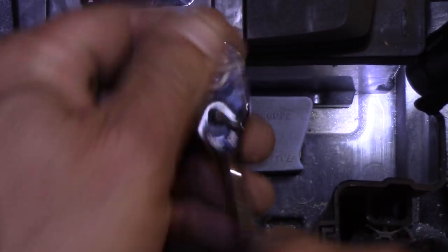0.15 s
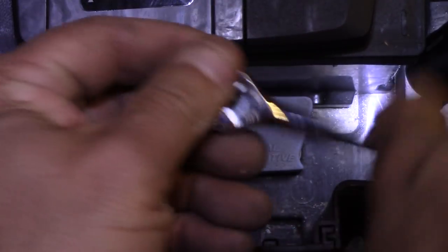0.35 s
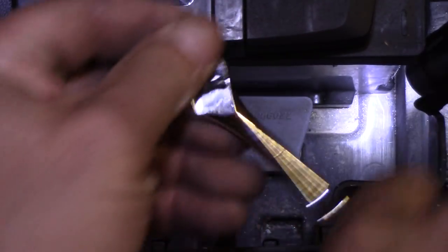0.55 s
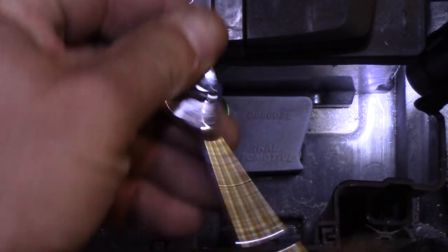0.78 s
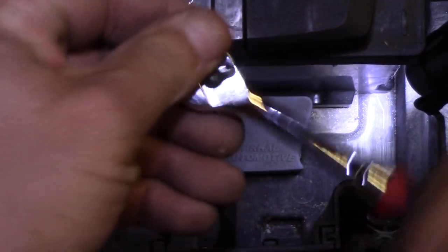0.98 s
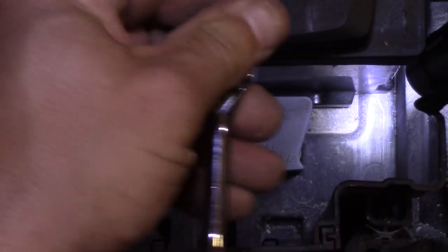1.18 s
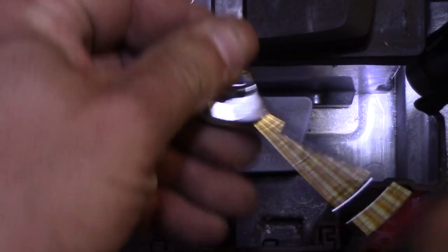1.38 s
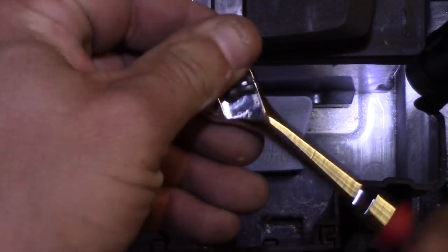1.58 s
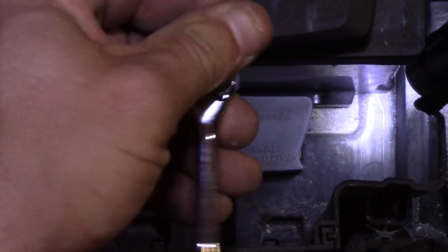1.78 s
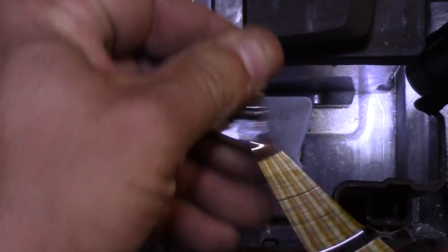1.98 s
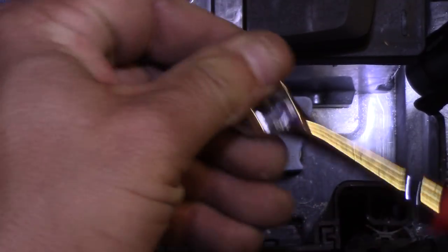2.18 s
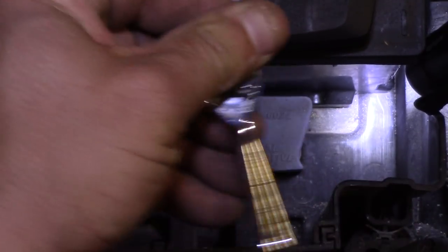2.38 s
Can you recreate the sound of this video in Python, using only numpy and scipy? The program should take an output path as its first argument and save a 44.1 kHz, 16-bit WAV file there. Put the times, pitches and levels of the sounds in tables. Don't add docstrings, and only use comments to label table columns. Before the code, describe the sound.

A hand ratchet clicks in four rapid bursts, at about 0.28-0.45, 0.87-0.96, 1.39-1.51 and 2.03-2.17 seconds, the second fastest and starting loudest. Each click is a crisp, bright steel snap. Between bursts, slack knocks a plastic cover dully, notably near 0.22, 0.57-0.69, 0.95 and 1.6 seconds, with gritty rubbing, dry ticks and low palm rustle. Close microphone, short dull engine-bay echo, faint garage hum.

```python
import sys
import numpy as np
from scipy import signal
from scipy.fft import rfft, irfft
from scipy.io import wavfile
from scipy.ndimage import uniform_filter1d

SR = 44100
rng = np.random.default_rng(int(sys.argv[2]) if len(sys.argv) > 2 else 0)


def invert_db(level):
    return 10 ** (np.asarray(level, dtype=float) / 20)


def pcm_store(signal):
    levels = np.round(np.clip(np.atleast_2d(signal), -1, 1) * 32767)
    wavfile.write(sys.argv[1], SR, levels.astype(np.int16).T)


N = 108045


def level(x, db):
    return x * invert_db(db) / np.sqrt(np.mean(x ** 2) + 1e-30)


def loudest(x, span_s):
    power = uniform_filter1d(x ** 2, int(span_s * SR))
    return x / np.sqrt(power.max())


def colour(x, table):
    hz, db = np.array(table, float).T
    f = np.maximum(np.arange(len(x) // 2 + 1) * SR / len(x), 1)
    gain = invert_db(np.interp(np.log(f), np.log(hz), db))
    return irfft(rfft(x) * gain, len(x))


def walk(rate_hz):
    hold = int(SR / rate_hz)
    steps = np.repeat(rng.standard_normal(N // hold + 1), hold)
    smooth = uniform_filter1d(uniform_filter1d(steps, hold), hold)
    return 4 / 3 * smooth[:N]


def add(out, x, s):
    i = max(int(s * SR), 0)
    out[i:i + len(x)] += x[:N - i]


def grit(size, grain_db):
    return rng.standard_normal(size) * invert_db(grain_db * rng.exponential(size=size))


def ring(drive, modes, spread, tilt_db=0, count=4):
    scatter_db = 1.7
    hz, db, t60 = np.repeat(np.array(modes, float), count, axis=0).T
    shift, cluster_luck = rng.standard_normal((2, len(hz)))
    mode_luck = np.repeat(rng.standard_normal(len(modes)), count)
    t = np.arange(min(2048, int(t60.max() * SR) + 64))[:, None] / SR
    hz = hz * (1 + spread * shift)
    gain = invert_db(db + scatter_db * (cluster_luck + mode_luck) + tilt_db * np.log2(hz / 1000))
    decay = np.exp(-np.log(1000) * t / np.maximum(t60, .003))
    body = (gain * decay * np.sin(2 * np.pi * hz * t)).sum(axis=1)
    return signal.fftconvolve(drive, body)[:len(drive)]


def garage():
    # (frequency [Hz], level [dB per Hz])
    hum = [(30, -30), (70, -15), (130, -6.5), (450, -1.5), (1400, -10), (8000, -25.5), (16000, -40.5)]
    return level(colour(rng.standard_normal(N), hum), -51)


def shuffle():
    centre_hz, rustle_db, swing_db = 211, -62.5, 4.5
    # (time of peak [s], level [dB], width [s])
    lean = [
        (.24, -5, 0.027),
        (.71, 11, 0.055),
        (1.05, -7, 0.027),
        (1.42, 10, 0.14),
    ]
    band = signal.butter(2, [centre_hz * .5, centre_hz * 2], "band", fs=SR)
    t = np.arange(N) / SR
    lean_db = sum(db * np.exp(-.5 * ((t - s) / width) ** 2) for s, db, width in lean)
    rustle = signal.lfilter(*band, signal.lfilter(*band, rng.standard_normal(N)))
    return level(rustle, rustle_db) * invert_db(lean_db + swing_db * walk(8.86))


def rub():
    grain_db, flicker_db = 2.2, 1.5
    # (time of peak [s], level [dB], rise [s], fall [s])
    swells = [(.01, -47.5, .05, 0.058), (.56, -62, 0.0041, 0.028), (.625, -51, 0.017, .015),
              (0.647, -43, 0.0055, 0.029), (0.713, -44.5, 0.027, 0.027), (1.005, -51, 0.014, 0.018),
              (1.177, -43.5, .045, 0.049), (1.55, -52, 0.0096, 0.032), (1.719, -47.5, 0.033, 0.053),
              (1.84, -53, 0.0083, 0.019), (1.95, -55.5, 0.017, 0.014), (2.41, -53, 0.041, 0.035)]
    # (frequency [Hz], level [dB per Hz])
    hiss = [(60, -57), (400, -0.5), (1500, 0), (3500, -3), (4700, -3), (6000, -10), (11000, -16),
            (16000, -35)]
    t = np.arange(N) / SR
    swell = np.zeros(N)
    for s, db, rise, fall in swells:
        width = np.where(t < s, rise, fall)
        swell += invert_db(db) * np.exp(-.5 * ((t - s) / width) ** 2)
    grains = level(colour(grit(N, grain_db), hiss), 0)
    return grains * swell * invert_db(flicker_db * walk(37.34))


def ticks():
    decay_s = .002
    # (time [s], peak level [dB], centre frequency [Hz])
    contacts = [(0.153, -44.5, 2370), (0.557, -43, 3300), (0.572, -35, 3900), (0.645, -35, 8350),
                (.668, -50, 9000), (0.684, -37, 2700), (0.856, -45, 8200), (1.002, -44, 2800),
                (1.031, -35.5, 3400), (1.066, -47.5, 8050), (1.09, -47, 3900), (1.154, -47, 9000),
                (1.176, -34, 3520), (1.177, -34.5, 8800), (1.289, -43, 2200), (1.371, -46, 8350),
                (1.552, -40.5, 3500), (1.584, -37, 2800), (1.608, -38, 2900), (1.815, -44.5, 6000),
                (1.836, -41, 6000), (1.868, -46.5, 5000), (2.012, -46, 8100), (2.24, -54, 7500),
                (2.325, -50.5, 8250), (2.366, -40.5, 10300), (2.395, -47, 6960)]
    out, t = np.zeros(N), np.arange(1024) / SR
    for s, db, hz in contacts:
        band = signal.butter(3, [hz / 1.7, hz * 1.35], "band", fs=SR)
        burst = rng.standard_normal(len(t)) * np.exp(-t / decay_s)
        add(out, invert_db(db) * loudest(signal.lfilter(*band, burst), 0.0068) / 2, s)
    return out


def knocks():
    # (time [s], rms level [dB], build-up [s], fade [s], brightness [dB per octave])
    pushes = [(0.156, -57, 0.0058, 0.0052, -10), (0.814, -44, 0.0019, 0.01, -22),
              (0.201, -44, 0.0074, .004, -4), (0.221, -30.5, 0.0063, 0.0058, -11.5),
              (.235, -40, 0.0022, 0.0034, 6), (.244, -40.5, 0.004, 0.0035, -20),
              (0.546, -39, 0.0083, 0.0095, 5), (.561, -32, 0.0018, 0.0039, 2),
              (0.573, -29, 0.0021, 0.0032, 12), (0.58, -31, 0.0042, 0.0037, -2),
              (0.589, -36.5, 0.005, 0.0018, -17.5), (.646, -34, 0.0013, 0.0023, 23.5),
              (.685, -28, 0.00057, 0.0043, -2), (.689, -24.5, 0.00081, 0.0033, -2),
              (0.71, -44, 0.021, 0.058, -15.5), (0.949, -25.5, 0.0012, 0.0052, 4),
              (1.032, -34.5, 0.0029, 0.0072, 16), (1.058, -35, 0.0064, 0.017, -0.5),
              (1.355, -41, 0.011, 0.015, -1.5), (1.552, -39, 0.012, 0.05, 4),
              (1.589, -29.5, 0.0024, 0.0075, -2), (1.61, -25.5, 0.0017, 0.0031, 3.5),
              (1.618, -32, 0.0026, 0.0036, -7), (1.974, -44.5, 0.0011, 0.0043, 8),
              (1.991, -39.5, 0.0098, 0.015, -4), (2.106, -31, 0.0036, 0.0067, -3),
              (2.213, -37, 0.0053, 0.019, 11), (2.231, -35, 0.004, 0.02, 9.5),
              (2.282, -44.5, 0.004, 0.0018, -17)]
    # (frequency [Hz], level [dB], T60 [s])
    cover = [(301, 0.5, 0.12), (474, 15.5, 0.026), (591, 22.5, 0.028), (783, 27, 0.024), (1053, 30, 0.022),
             (1248, 21, 0.024), (1598, 18.5, 0.028), (1910, 9, 0.024), (2200, 7.5, 0.018),
             (2760, -6.5, 0.03), (3270, -9.5, 0.03), (4350, -25, 0.028)]
    out = np.zeros(N)
    t = np.arange(6144) / SR - .05
    for s, db, build, fade, tilt_db in pushes:
        push = np.where(t < 0, np.exp(-.5 * (t / build) ** 2), np.exp(-np.maximum(t, 0) / fade))
        sound = ring(rng.standard_normal(len(t)) * push, cover, .015, tilt_db, count=3)
        add(out, invert_db(db) * loudest(sound, 0.0059), s + t[0])
    return out


def ratchet():
    rebound_s, rebound_db = .0014, -4
    snap_lag_s = .0007
    # (time [s], gear level [dB], extension level [dB], head level [dB], pawl level [dB])
    stroke_1 = [(0.2767, -18, -28.5, -29.5, -37), (0.294, -19.5, -27, -28.5, -36),
                (0.311, -22, -26.5, -25, -33), (0.3296, -18.5, -28.5, -29.5, -33),
                (0.3507, -21, -30, -31.5, -37), (0.368, -21, -25, -26.5, -31), (0.382, -23, -28, -32, -32),
                (0.3971, -24, -24, -30, -35), (0.4105, -24.5, -25.5, -24.5, -31),
                (0.4236, -22, -26.5, -32.5, -31), (0.4459, -18.5, -27, -26.5, -30)]
    stroke_2 = [
        (0.8654, -12.5, -32, -27.5, -33),
        (0.8759, -14, -28, -26.5, -37),
        (0.885, -19, -23, -33, -34),
        (0.8939, -15.5, -25.5, -27, -35),
        (0.9012, -18, -26, -31, -28),
        (0.9108, -17, -22.5, -27, -35),
        (0.9179, -20, -28, -31, -35),
        (0.9262, -17, -24, -37, -32),
        (0.9381, -27, -24, -24.5, -33),
        (0.9563, -21.5, -26.5, -25.5, -36),
    ]
    stroke_3 = [(1.3932, -14.5, -28.5, -33, -29), (1.4071, -22, -38, -27, -29),
                (1.4166, -19, -32.5, -28, -29), (1.4263, -19, -30.5, -24, -32),
                (1.4357, -20, -31.5, -24, -33), (1.4455, -26, -26, -24.5, -34),
                (1.4546, -20, -24.5, -24.5, -29), (1.4657, -17, -31.5, -35, -45),
                (1.4751, -19, -26.5, -24, -35), (1.4875, -22, -27, -26, -36), (1.508, -20, -30, -20.5, -35)]
    stroke_4 = [(2.0256, -22.5, -28.5, -26, -30), (2.0373, -18, -27.5, -28, -37),
                (2.0476, -19.5, -28.5, -33, -36), (2.0557, -20, -26.5, -26.5, -30),
                (2.0657, -16, -28, -27.5, -30), (2.0746, -22, -28.5, -24.5, -33),
                (2.0838, -26, -28, -22, -32), (2.094, -22, -23.5, -24, -31), (2.1096, -20, -33, -22.5, -34),
                (2.123, -17.5, -36, -22.5, -29), (2.14, -19.5, -26, -21, -29),
                (2.171, -19.5, -27, -23, -29.5)]
    # (frequency [Hz], level [dB], T60 [s])
    extension = [(611, -2, 0.08), (1123, -3.5, 0.088), (1315, 13.5, 0.015), (1560, 6.5, 0.021),
                 (1700, 7.5, 0.018), (1940, 6, 0.022), (2173, 17, 0.0084), (2395, 5, 0.031),
                 (2980, -3, 0.011)]
    head = [(2950, 2.5, 0.031), (3510, 4, 0.025), (3900, 1.5, 0.013), (4320, 6.5, 0.0067),
            (4590, 8, 0.0078), (5010, -4, .008), (6000, -3, 0.03)]
    gear = [(6370, -10, 0.012), (7500, 2, 0.016), (8170, 8.5, 0.0077), (8070, -6, .03), (8720, -3, 0.0092),
            (10100, -27, 0.0054)]
    pawl = [(11150, -11, 0.0066), (11920, -1, 0.0066), (12600, -4, 0.0064), (13500, -6, .02),
            (15500, -14, 0.0032)]
    part_levels = (1.5, 2, -5, -2)
    chatter = (0.0055, 0.0018, 0.0014, 0.0029)
    build_up = (0.0026, 0.0023, 0.00011, 0.00015)
    spreads = (0.015, 0.022, 0.014, 0.008)
    gear_sag = (0.026, 0.06, 0.042, 0.033)
    # (extension tilt [dB per octave], head tilt [dB per octave])
    grip_tilt = [(1, -0.82), (9, 0.77), (-4, -0.067), (-5, 0.38)]

    def blow(u, build, fade):
        return (1 - np.exp(-u / build)) * np.exp(-u / fade)

    out, t = np.zeros(N), np.arange(2560) / SR
    for stroke, sag, grip in zip((stroke_1, stroke_2, stroke_3, stroke_4), gear_sag, grip_tilt):
        first, last = stroke[0][0], stroke[-1][0]
        for s, gear_db, ext_db, head_db, pawl_db in stroke:
            late = np.maximum(t - rebound_s * (.5 + rng.random()), 0)
            turn = (s - first) / (last - first)
            sagged = [(hz * (1 - sag * (turn - .5)), db, t60) for hz, db, t60 in gear]
            parts = zip((extension, head, sagged, pawl), (ext_db, head_db, gear_db, pawl_db),
                        part_levels, chatter, build_up, spreads, (*grip, 0, 0))
            for modes, db, part_db, fade, build, spread, tilt_db in parts:
                force = blow(t, build, fade) + invert_db(rebound_db) * blow(late, build, fade)
                sound = ring(grit(len(t), 1.8) * force, modes, spread, tilt_db)
                add(out, invert_db(db + part_db) * loudest(sound, 0.00061), s + snap_lag_s)
    steel_cut = signal.butter(3, 590, "high", fs=SR, output="sos")
    return signal.sosfilt(steel_cut, out)


def noise_tail(t, decay):
    return decay / np.sqrt(np.sum(decay ** 2))


def bay(x):
    t60_s, dull_hz = 0.1, 5000
    t = np.arange(8192) / SR
    noise = signal.lfilter(*signal.butter(1, dull_hz, fs=SR), rng.standard_normal(len(t)))
    tail = noise * np.exp(-np.log(1000) * t / t60_s)
    return signal.fftconvolve(x, tail / np.sqrt(np.sum(tail ** 2)))[:N]


def port_difference(mid):
    # (frequency [Hz], level [dB])
    leak = [(500, -72), (2000, -79), (4000, -26), (8000, -28.5), (12000, -23.5)]
    # (frequency [Hz], level [dB per Hz])
    air = [(30, -7), (400, 2), (2300, -6.5), (6000, -25)]
    t = np.arange(256) / SR
    smear = rng.standard_normal(len(t)) * np.exp(-t / 0.0028)
    smeared = signal.fftconvolve(mid, smear / np.sqrt(np.sum(smear ** 2)))[:N]
    return colour(smeared, leak) + level(colour(rng.standard_normal(N), air), -66)


def scene():
    low_cut = signal.butter(4, 190, "high", fs=SR, output="sos")
    tool = signal.sosfilt(low_cut, ticks() + knocks() + ratchet())
    mid = garage() + shuffle() + rub() + tool + invert_db(-12.5) * bay(tool)
    side = port_difference(mid)
    return np.array([mid + side, mid - side])


def band_limit(x):
    return signal.sosfilt(signal.butter(12, 16800, fs=SR, output="sos"), x)


def record(dry):
    top_cut = signal.ellip(6, .5, 45, 15700, fs=SR, output="sos")
    mix = signal.sosfilt(top_cut, dry)
    return band_limit(mix)


dry = scene()
out = record(dry)
pcm_store(out)
```